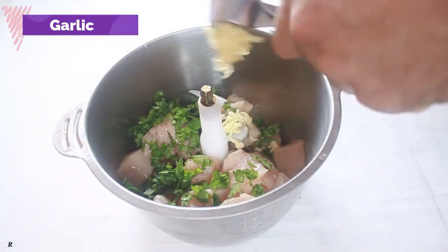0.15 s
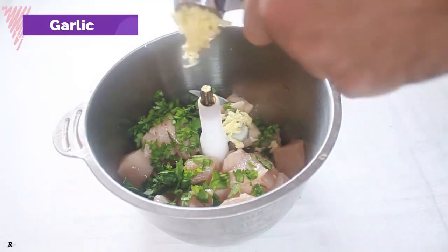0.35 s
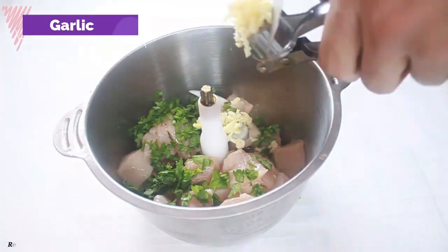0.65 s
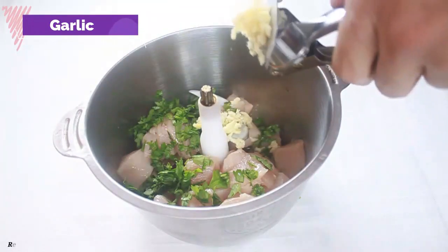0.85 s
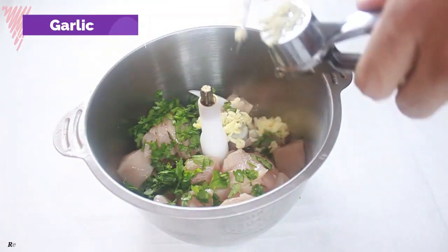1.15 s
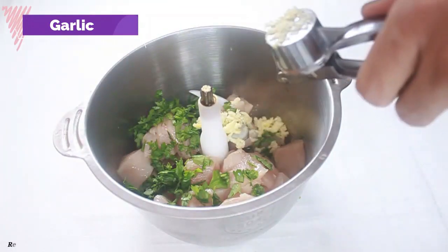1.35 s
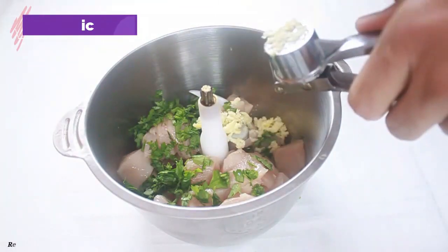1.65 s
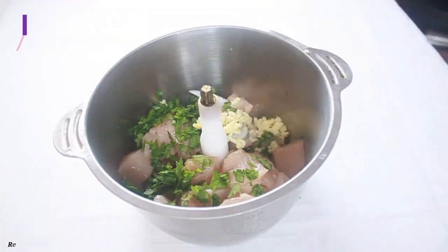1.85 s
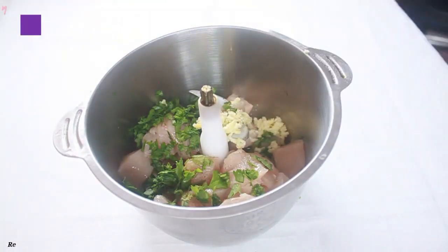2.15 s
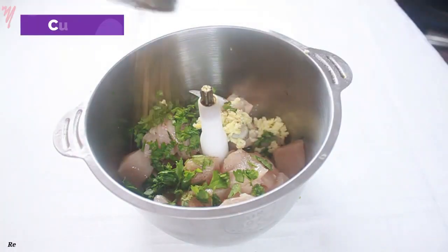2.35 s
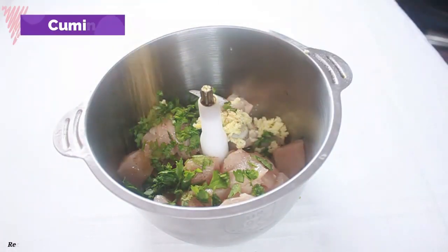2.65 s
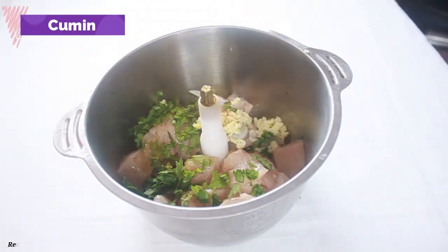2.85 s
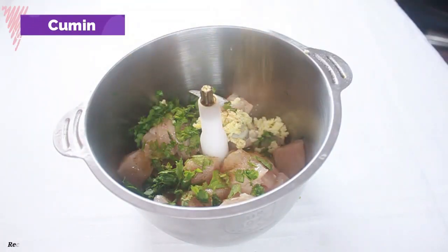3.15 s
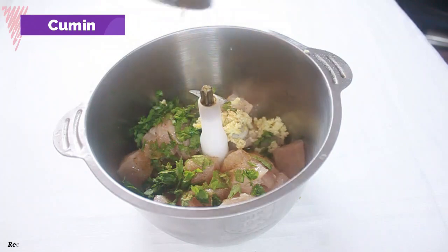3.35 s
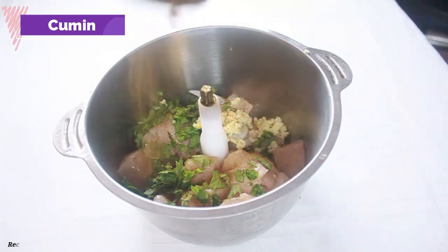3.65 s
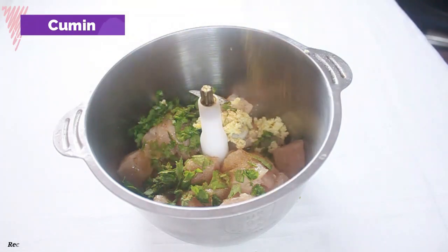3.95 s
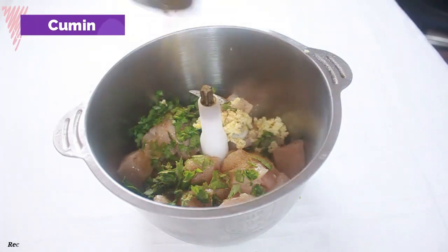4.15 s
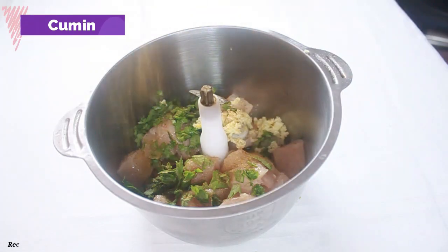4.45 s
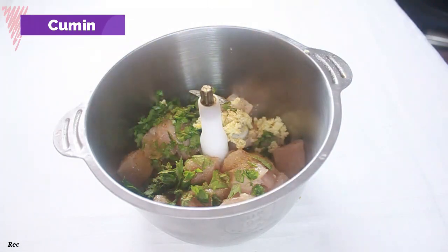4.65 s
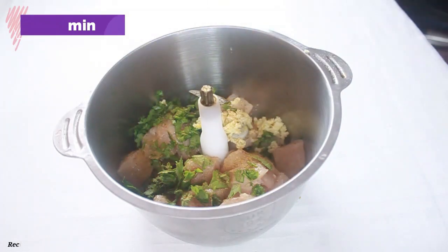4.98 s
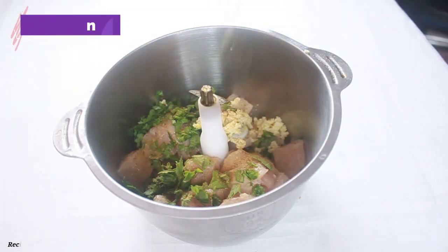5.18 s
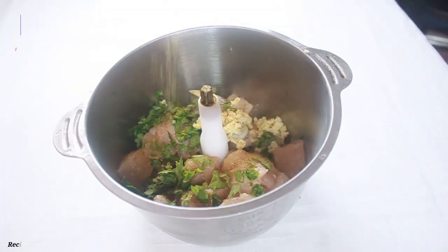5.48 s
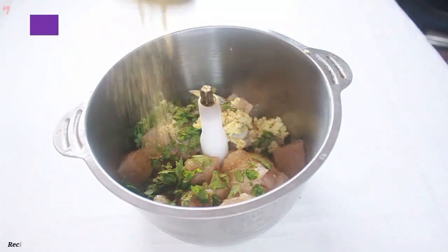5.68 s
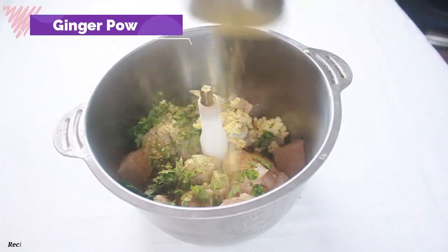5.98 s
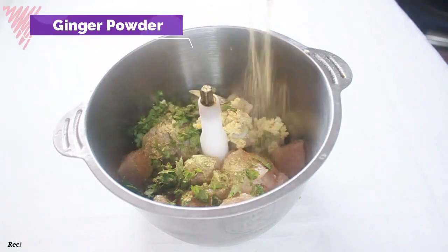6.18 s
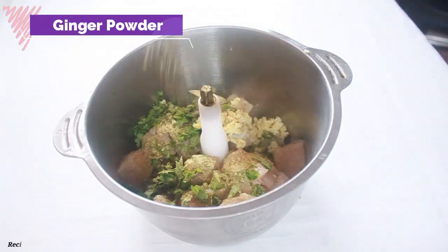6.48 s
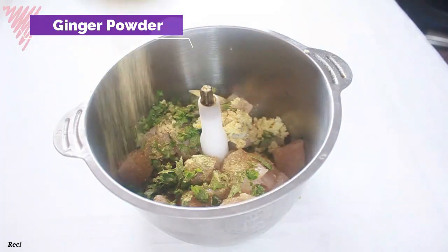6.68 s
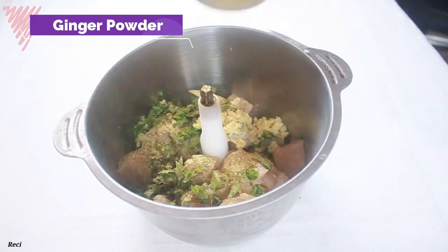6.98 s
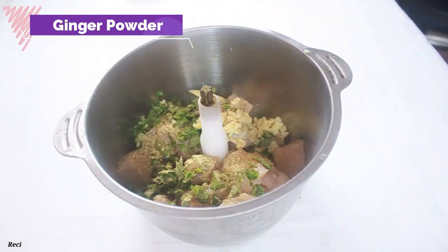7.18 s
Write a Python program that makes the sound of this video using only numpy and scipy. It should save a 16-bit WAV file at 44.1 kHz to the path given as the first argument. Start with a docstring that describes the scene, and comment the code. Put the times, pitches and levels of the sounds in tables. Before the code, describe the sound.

A small kitchen, close microphone, faint steady air and short reflections. At about 0.1 s a dull knock on the worktop is followed by a tiny hinge click, with more clicks near 0.45 and 0.7 s amid soft rubbing. Gritty, bright knife scrapes gather from 0.7 s, ending in a sharp cluster of metallic clacks at 0.96 s; a weaker scrape comes at 1.14 s, then a brief thin hiss. At 1.8 s the press knocks hard on a steel bowl, the loudest sound, its bright noisy tail stopping abruptly. From 2 to 4.5 s a spice jar is shaken irregularly: short swishes of powder, soft bassy thumps, crisp crackles and sharp ticks. Hands rub quietly until 5.3 s, with a faint high swish. At 5.9 s a small jar clinks, high and brief. Faint sprinkles and rubs close the scene.

```python
"""A knife scrapes and clacks on a metal garlic press close to the microphone in a small kitchen.
The press clicks at its hinge and knocks once on a steel mixing bowl, with a bright tail cut off abruptly.
A crackling spice jar is shaken in soft thumps; later a small jar clinks amid rubs and sprinkles.
Struck bodies are decaying sines under a noise crack; scrapes, crackles and powder are shaped noise.
Bumps and thumps wake bass resonances; short reflections and still air lie behind."""
import sys
import numpy as np
from scipy import signal
from scipy.fft import rfft, irfft
from scipy.io import wavfile

SR = 44100
rng = np.random.default_rng(int(sys.argv[2]) if len(sys.argv) > 2 else 0)


def waveform_to_disk(signal):
    """Save audio, clipped to [-1, 1], as 16-bit WAV at the path in sys.argv[1]."""
    frames = np.transpose(np.atleast_2d(signal))
    scaled = np.clip(frames, -1, 1) * 32767
    samples = np.round(scaled).astype(np.int16)
    wavfile.write(sys.argv[1], SR, samples)


N = 322812
T = np.arange(N) / SR
AGE = T[:SR]   # seconds since a blow


def amp(db):
    """Decibels to gain."""
    return 10 ** (np.asarray(db) / 20)


def rms_one(x):
    """Scale to unit power."""
    return x / np.sqrt(np.mean(x ** 2) + 1e-20)


def fade(t60):
    """Exponential decay after a blow, falling 60 dB in t60 seconds."""
    return np.exp(-np.log(1000) * AGE / t60)


def swell(peak_s, length_s):
    """A smooth bell-shaped rise and fall around its peak."""
    return np.exp(-.5 * ((T - peak_s) / length_s) ** 2)


def envelope(start_s, length_s, attack_s, release_s):
    """Rise from the start, hold until the length has passed, then die away."""
    rise = np.clip((T - start_s) / attack_s, 0, 1)
    return rise * np.exp(-np.clip((T - start_s - length_s) / release_s, 0, 20))


def moves(rows, attack_s, release_s):
    """Gain of a run of movements; where they overlap their powers add."""
    power = sum((amp(db) * envelope(start_s, length_s, attack_s, release_s)) ** 2
                for start_s, length_s, db in rows)
    return np.sqrt(power)


def add(out, start_s, sound):
    """Mix a sound in at its start."""
    at = max(round(start_s * SR), 0)
    out[at:at + len(sound)] += sound[:N - at]


def high_pass(x, cut_hz):
    """Remove the bass below a cut-off."""
    return signal.sosfilt(signal.butter(2, cut_hz, "high", fs=SR, output="sos"), x)


def colour(x, points):
    """Give a signal a spectrum drawn through points, with steep ends; rms 1."""
    hz, db = np.transpose(points)
    f = np.maximum(np.fft.rfftfreq(len(x), 1 / SR), 1)
    ends = np.minimum(f / hz[0], 1) ** 3 * np.minimum(hz[-1] / f, 1) ** 3
    curve = amp(np.interp(np.log(f), np.log(hz), db))
    return rms_one(irfft(rfft(x) * ends * curve, len(x)))


def hiss(points):
    """Coloured noise; rms 1."""
    return colour(rng.standard_normal(N), points)


def band_noise(hz, width_hz, size=N, order=1):
    """Noise through one resonance; rms 1."""
    low = np.hypot(hz, width_hz / 2) - width_hz / 2
    edges = np.clip([low, low + width_hz], 20, [.44 * SR, .47 * SR])
    band = signal.butter(order, edges, "band", fs=SR, output="sos")
    return rms_one(signal.sosfilt(band, rng.standard_normal(size)))


def grit(spread_db, per_s):
    """The uneven grip of a sliding contact, as a wandering gain; rms 1."""
    wander = np.interp(T * per_s, np.arange(N), rng.standard_normal(N))
    return rms_one(amp(spread_db * wander))


def grains(per_s, size_db, grain_t60):
    """Power of random decaying grains, a few large and many small; mean 1."""
    sizes = amp(size_db * np.minimum(rng.exponential(1, N), 3)) * (rng.random(N) < per_s / SR)
    power = signal.lfilter([1], [1, -amp(-120 / (grain_t60 * SR))], sizes ** 2 + 1e-18)
    return power / power.mean()


def ringing(modes):
    """Decaying sines of a body after one contact."""
    return sum((-1) ** k * amp(db) * np.sin(2 * np.pi * hz * AGE) * fade(t60)
               for k, (hz, db, t60) in enumerate(modes))


def strike(hits, modes, crack_db, crack_t60, crack_hz, travel_s=0):
    """Each contact rings the modes with strengths of its own, under a short gritty crack."""
    out = np.zeros(N)
    for hit_s, db in hits:
        for k, (hz, mode_db, t60) in enumerate(modes):
            lag_s = travel_s * np.sqrt(crack_hz / hz)   # in sheet metal low bending waves travel slower
            level_db = db + mode_db + rng.standard_normal()
            add(out, hit_s + lag_s, (-1) ** k * ringing([(hz, level_db, t60)]))
        crack = band_noise(crack_hz, crack_hz * 1.2, size=SR, order=2) * fade(crack_t60)
        add(out, hit_s + travel_s, amp(db + crack_db) * crack)
    return out


# spectrum of the still air: pitch_hz, level_db
AIR_COLOUR = [(25, -14), (50, -14), (85, -4), (140, -7), (260, -7.5), (480, -6), (700, -8), (1150, -8.5),
              (2100, -11), (4000, -11), (12400, -15.5), (15800, -19)]


def still_air(level_db=-56):
    """The kitchen at rest, as steady coloured noise."""
    return amp(level_db) * hiss(AIR_COLOUR)


def kitchen(x, t60=.38, treble_t60=0.18, treble_hz=7000, build_s=0.0027):
    """Dense reflections whose treble dies first."""
    white = rng.standard_normal(SR)
    dull = signal.sosfilt(signal.butter(1, treble_hz, fs=SR, output="sos"), white)
    tail = dull * fade(t60) + (white - dull) * fade(treble_t60)
    tail = tail * (1 - np.exp(-AGE / build_s))
    return signal.fftconvolve(x, tail / np.linalg.norm(tail))[:N]


# the kitchen's bass resonances: pitch_hz, level_db, t60_s
ROOM_MODES = [(91.24, -11.5, 1), (123, -13, 0.58), (156.5, -17, 0.88), (200.5, -24, .3)]
# soft bumps on the table: start_s, level_db, pitch_hz
BUMPS = [(0.091, -51, 100), (0.131, -44.5, 188), (1.149, -48, 100), (4.239, -45, 205), (5.1, -59, 90),
         (5.771, -55, 79)]


def bumps(bump_t60=0.08):
    """A low thud on the table wakes the lowest of the room's resonances."""
    out = np.zeros(N)
    for start_s, db, hz in BUMPS:
        add(out, start_s, amp(db) * (ringing([(hz, -3, bump_t60)]) + ringing(ROOM_MODES[:1])))
    return out


# sleeves and hands moving over the table: peak_s, level_db, length_s
SHUFFLES = [(.35, -60.5, 0.26), (1.167, -63, 0.15), (2.2, -64, 0.53), (3.555, -64, 0.29),
            (4.953, -62.5, 0.43), (7.15, -62.5, 0.49)]
# their spectrum: pitch_hz, level_db
SHUFFLE_COLOUR = [(110, -13), (220, -9.5), (480, -6), (700, -16.5), (1200, -22)]


def shuffles():
    """Cloth and skin on the table, as slow swells of low noise."""
    return sum(amp(db) * swell(peak_s, length_s) for peak_s, db, length_s in SHUFFLES) * hiss(SHUFFLE_COLOUR)


# hands rubbing on the things they hold: start_s, length_s, level_db
RUBS = [(.13, 0.28, -56.5), (.37, 0.12, -52.5), (.65, 0.16, -57), (4.47, 0.17, -54), (4.65, 0.24, -54),
        (5.097, 0.037, -52), (5.29, 0.04, -59.5), (6.405, 0.022, -53.5), (6.55, .37, -63),
        (7.1, 0.064, -48.5), (7.21, 0.09, -51)]
# their spectrum: pitch_hz, level_db
RUB_COLOUR = [(410, -54), (700, -13), (1120, -2.5), (1210, -11), (1860, 1.5), (2240, -1), (6350, -2),
              (8240, -9), (12000, -5.5), (15800, -16)]


def rubs(attack_s=0.012, release_s=0.069):
    """Skin friction, as coloured noise with an uneven grip."""
    return moves(RUBS, attack_s, release_s) * hiss(RUB_COLOUR) * grit(2.5, 400)


# fingers sliding on the jars: peak_s, level_db, length_s, pitch_hz
SLIDES = [(0.134, -62, 0.03, 560), (2.866, -60.5, 0.087, 3250), (3.81, -56, 0.032, 3820),
          (4.668, -46, .01, 6000), (4.716, -53, 0.067, 6200), (4.818, -59, .09, 485),
          (4.86, -64, 0.076, 1950), (5.2, -62.5, .07, 324), (5.28, -43, 0.0094, 12200),
          (6.84, -61.5, 0.11, 1550), (7.274, -53, 0.027, 13000)]


def slides(width=0.29):
    """Soft swells of friction, each in one resonance; width is a share of its pitch."""
    return sum(amp(db) * swell(peak_s, length_s) * band_noise(hz, width * hz, order=2)
               for peak_s, db, length_s, hz in SLIDES)


def sizzle(start_s=1.272, level_db=-45, attack_s=0.02, release_s=0.048):
    """A thin high hiss that flares and at once dies away."""
    flare = envelope(start_s, attack_s, attack_s, release_s)
    return amp(level_db) * flare * band_noise(13800, 1800, order=3)


# garlic and powder landing and ticking: start_s, length_s, level_db
SPRINKLES = [(.38, 0.16, -59.5), (5.3, 0.15, -57.5), (6.03, 0.19, -65.5), (6.45, 0.14, -60)]


def sprinkles(per_s=45, size_db=6.5, speck_t60=0.011, speck_hz=11000, width_hz=6500):
    """Landing specks, as sparse, faint, bright ticks of uneven size."""
    gain = np.sqrt(grains(per_s, size_db, speck_t60))
    return moves(SPRINKLES, attack_s=0.025, release_s=0.15) * gain * band_noise(speck_hz, width_hz, order=2)


# dull knocks on the worktop: start_s, level_db
TOP_HITS = [(0.0864, -32.5), (0.1320, -42)]
# the worktop's modes: pitch_hz, level_db, t60_s
TOP_MODES = [(200, -10.5, 0.056), (440, -6, 0.031), (543, -1, 0.034), (1020, -11, 0.029), (4200, -9, .012)]


def worktop():
    """The worktop answers a knock with a few short, mostly low modes."""
    return strike(TOP_HITS, TOP_MODES, crack_db=-11, crack_t60=0.02, crack_hz=1300)


# clinks of a small jar: start_s, level_db
JAR_HITS = [(5.8873, -31.5), (5.8884, -32.5), (5.8922, -47)]
# the jar's modes: pitch_hz, level_db, t60_s
JAR_MODES = [(3490, -5, 0.071), (3850, -4, 0.034), (4205, -0.5, 0.02), (4760, -12, 0.042),
             (6830, -22, .006)]


def jar_clinks():
    """A small jar rings high and briefly at each contact."""
    return strike(JAR_HITS, JAR_MODES, crack_db=-3.0, crack_t60=0.026, crack_hz=5760)


# the sharpest ticks of blade, garlic skin and foil: start_s, level_db (before gain_db), pitch_hz
TICKS = [(0.1385, -30, 9100), (0.4845, -25.5, 9700), (0.8203, -27, 11600), (0.905, -30, 12000),
         (0.9775, -14, 8640), (1.1455, -26, 11000), (1.86, -25, 10400), (1.893, -29.5, 6000),
         (2.018, -27, 11400), (2.054, -25.5, 9400), (2.147, -31, 12000), (2.194, -24.5, 12500),
         (2.626, -26, 9900), (3.094, -24.5, 9400), (3.2227, -22, 10100), (3.361, -21.5, 12000),
         (3.3897, -28, 10500), (3.737, -28.5, 3170), (3.928, -29, 10600), (4.063, -26.5, 9400),
         (4.227, -23, 10300), (4.322, -27, 9500), (4.398, -22, 9300), (4.447, -30, 9900),
         (4.659, -19.5, 5800), (5.6156, -30.5, 9300)]


def ticks(snap_t60=0.0051, after_t60=0.041, after_db=-14, gain_db=-5, width=0.51):
    """A sharp snap, then a brief, fainter shiver in the same band."""
    out = np.zeros(N)
    decay = fade(snap_t60) + amp(after_db) * fade(after_t60)
    for start_s, db, hz in TICKS:
        add(out, start_s, amp(db + gain_db) * band_noise(hz, width * hz, size=SR, order=2) * decay)
    return out


# crackles of the spice jar's foil seal or plastic: start_s, length_s, level_db
CRACKLES = [(1.985, 0.11, -48), (2.19, 0.074, -49), (2.37, 0.059, -46), (2.495, 0.037, -46.5),
            (2.64, 0.32, -49), (3.0, 0.22, -51), (3.26, 0.16, -45.5), (3.45, 0.11, -50.5),
            (3.6, 0.27, -48.5), (3.98, 0.034, -52.5), (4.09, 0.096, -42.5), (4.2, 0.58, -49)]
# their spectrum: pitch_hz, level_db
CRACKLE_COLOUR = [(880, -20), (1500, -8), (2020, -7.5), (2740, -18), (3200, -8.5), (7260, -6.5), (9670, -2),
                  (13900, -2.5), (15800, -7)]


def crackle(per_s=110, size_db=6.5, grain_t60=0.019, bed=0.29, shared=0.55):
    """Countless tiny creases; some are broad, others sound in one band only."""
    broad, creases = grains(per_s, size_db, grain_t60), 0
    for hz in np.geomspace(2000, 14000, num=7):
        power = shared ** 2 * broad + grains(per_s, size_db, grain_t60) / 2 + bed ** 2
        creases = creases + np.sqrt(hz * power) * band_noise(hz, hz / 2, order=2)
    return moves(CRACKLES, attack_s=0.012, release_s=0.031) * colour(creases, CRACKLE_COLOUR)


# shakes of the spice jar: stop_s, powder_level_db, thump_level_db
SHAKES = [(2.101, -35.5, -42), (2.273, -38, -54), (2.548, -42, -51), (2.672, -44, -46),
          (2.785, -44.5, -47.5), (2.909, -48.5, -53), (3.019, -46, -39.5), (3.149, -42.5, -52),
          (3.284, -40, -36), (3.512, -40, -42.5), (3.637, -42.5, -47), (4.018, -49, -63),
          (4.147, -38.5, -38), (4.243, -43.5, -48), (4.371, -45.5, -53)]
# spectrum of the sliding powder: pitch_hz, level_db
POWDER_COLOUR = [(410, -50), (700, -20), (1120, -2.5), (1570, -22), (1910, -8), (2580, -5), (3060, -9),
                 (4070, -5), (10600, -11), (15800, -18)]


def powder(slide_s=0.016, halt_s=0.0024, note_db=-10.5, note_lead_s=0.01, note_s=0.007):
    """The powder gathers speed and stops short, sounding the jar's hollow on its way."""
    slide, note = np.zeros(N), np.zeros(N)
    for stop_s, db, _ in SHAKES:
        slide += amp(db) * np.exp(np.minimum((T - stop_s) / slide_s, (stop_s - T) / halt_s))
        note += amp(db + note_db) * swell(stop_s - note_lead_s, note_s)
    return slide * hiss(POWDER_COLOUR) + note * band_noise(1120, 150, order=2)


def jar_thumps(puff_hz=165, puff_t60=0.032, puff_db=2, boom_db=-17, boom_t60=0.42):
    """A stopped jar pushes a puff of air that wakes the room's bass resonances."""
    out = np.zeros(N)
    for stop_s, _, db in SHAKES:
        boom = amp(boom_db) * band_noise(197, 160, size=SR, order=2) * fade(boom_t60)
        puff = ringing([(puff_hz, puff_db, puff_t60)])
        add(out, stop_s, amp(db) * (puff + ringing(ROOM_MODES) + boom))
    return out


# the press knocking on the bowl: start_s, level_db
BOWL_HITS = [(1.8021, -1.5)]
# modes of the loaded bowl: pitch_hz, level_db, t60_s
BOWL_MODES = [(1090, -23.5, 0.0038), (1830, -22.5, 0.0077), (2676, -13, 0.021), (3380, -13, 0.011),
              (4230, -8, 0.013), (4870, -5.5, 0.014), (5600, -8.5, 0.012), (7680, -9, 0.013),
              (9800, -9, 0.0097), (12000, -20, 0.0062)]


def bowl_knock():
    """The loaded bowl rings only briefly, its bending waves arriving treble first."""
    knock = strike(BOWL_HITS, BOWL_MODES, crack_db=-12.0, crack_t60=0.015, crack_hz=7000, travel_s=.0005)
    return high_pass(knock, 700)   # the knock carries no bass below 700 Hz


# spectrum of the knock's noisy tail: pitch_hz, level_db
TAIL_COLOUR = [(900, -17), (1500, -24), (2200, -8.5), (2600, 1.5), (3000, 2), (3600, -10), (4100, -1.5),
               (4800, 1), (6200, -8), (7200, -3), (8700, -18), (10000, -8.5), (15800, -20)]


def clank_tail(start_db=-21.5, settled_db=-34, sag_db_per_s=520, length_s=.047, attack_s=0.0016, stop_s=.0007):
    """The bowl knock's bright, noisy tail sags to a level and is cut off abruptly."""
    knock_s = BOWL_HITS[0][0]
    db = np.maximum(start_db - sag_db_per_s * np.maximum(T - knock_s, 0), settled_db)
    return amp(db) * envelope(knock_s, length_s, attack_s, stop_s) * hiss(TAIL_COLOUR)


# clicks of the press's hinge: start_s, level_db
HINGE_HITS = [(0.1545, -32.5), (0.4570, -36.5), (0.6828, -31.5)]
# the hinge's modes: pitch_hz, level_db, t60_s
HINGE_MODES = [(3930, 5.5, 0.0082), (5200, -6, 0.0091), (6780, -8, .018)]


def hinge_clicks():
    """The hinge clicks in three short, high modes."""
    return strike(HINGE_HITS, HINGE_MODES, crack_db=-4.5, crack_t60=0.023, crack_hz=5400)


# knife strokes across the press: peak_s, level_db, length_s, pitch_hz
SCRAPES = [(0.132, -48.5, 0.0045, 8000), (0.41, -49, 0.026, 10000), (0.489, -44, 0.0053, 10000),
           (0.52, -46, 0.0049, 11000), (0.688, -40, 0.0075, 4700), (0.712, -40, .003, 5000),
           (0.757, -40, 0.0062, 5270), (0.77, -54, 0.038, 6040), (0.818, -41.5, 0.0063, 4900),
           (0.903, -42, 0.0066, 9000), (0.926, -45.5, 0.032, 11000), (0.967, -26, 0.0047, 6200),
           (1.142, -37, 0.0049, 6400)]


def scrapes(grit_db=6.5, width=1.13):
    """The blade catches and slides: short swells of gritty friction."""
    strokes = sum(amp(db) * swell(peak_s, length_s) * band_noise(hz, width * hz)
                  for peak_s, db, length_s, hz in SCRAPES)
    return high_pass(strokes * grit(grit_db, 2500), 1200)


# knife clacking on the press: start_s, level_db
PRESS_HITS = [(0.9568, -13.5), (0.9583, -12), (0.9632, -24), (0.9692, -18.5), (0.9724, -17), (0.9772, -38),
              (1.1410, -37)]
# the press's modes: pitch_hz, level_db, t60_s
PRESS_MODES = [(1047, -20.5, 0.032), (2540, -24.5, 0.023), (3660, -13.5, 0.044), (4077, -7.5, 0.031),
               (4220, -3.5, 0.033), (4510, -7.5, 0.022), (4750, -14, .03), (5110, -4, .014),
               (5540, -11, .02), (6300, -29, 0.019), (7560, -13, 0.025), (8100, -8.5, 0.013),
               (8800, -17, 0.013), (9400, -9.5, 0.013), (9960, -16, 0.018), (11110, -6.5, 0.028),
               (11800, -12, .012), (13300, -14, 0.016)]


def press_clacks():
    """The metal press answers the knife with many short, bright modes."""
    return strike(PRESS_HITS, PRESS_MODES, crack_db=-10.5, crack_t60=0.02, crack_hz=8100)


def scene():
    """Utensils, jars and hands close to the microphone, in the kitchen's air."""
    press = press_clacks()
    bowl = bowl_knock()
    jar = jar_clinks()
    hinge = hinge_clicks()
    top = worktop()
    tail = clank_tail()
    blade = scrapes()
    # the spice jar and other small, close sounds
    small = ticks() + crackle() + powder() + sprinkles() + hinge
    soft = rubs() + slides() + sizzle() + shuffles()
    to_room = amp(-13) * press + amp(-7.0) * blade + amp(-35) * bowl
    to_room = to_room + amp(-7) * jar + amp(-7) * top + amp(-11.0) * small
    background = kitchen(to_room) + still_air()
    low = jar_thumps() + bumps()
    return (press + bowl + tail + jar + top + blade + small + soft + low + background)[None]


def record(dry, low_cut_hz=55, top_cut_hz=15900):
    """The microphone sheds deep bass, loud peaks are rounded and the top is cut."""
    thinned = high_pass(dry, low_cut_hz)
    rounded = 1.4 * np.tanh(thinned / 1.4)
    return signal.sosfilt(signal.ellip(10, .1, 70, top_cut_hz, fs=SR, output="sos"), rounded)


dry = scene()
out = record(dry)
waveform_to_disk(out)
```